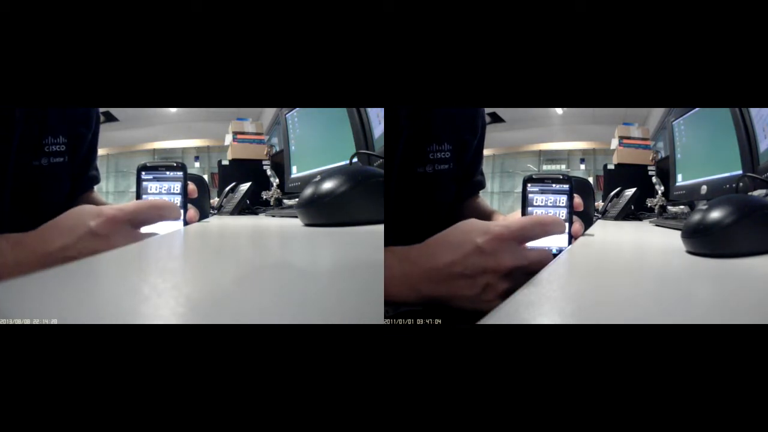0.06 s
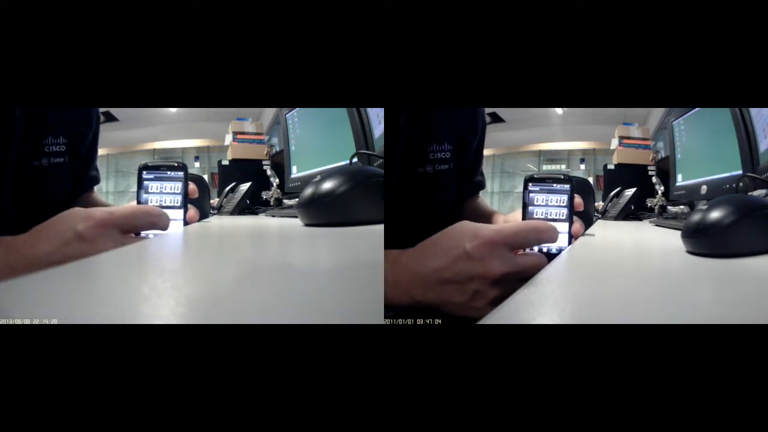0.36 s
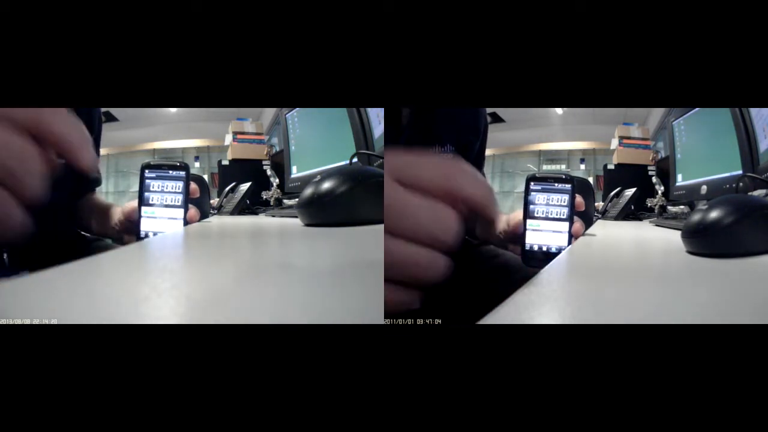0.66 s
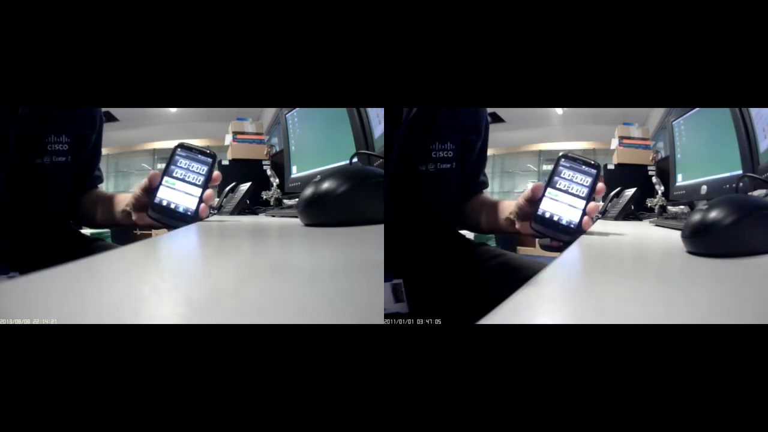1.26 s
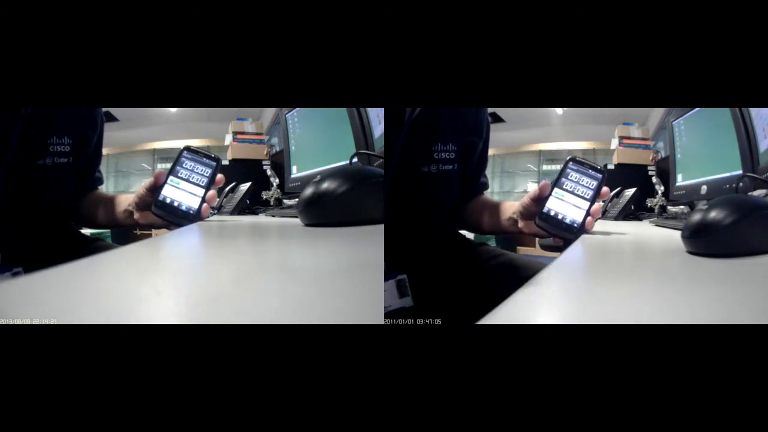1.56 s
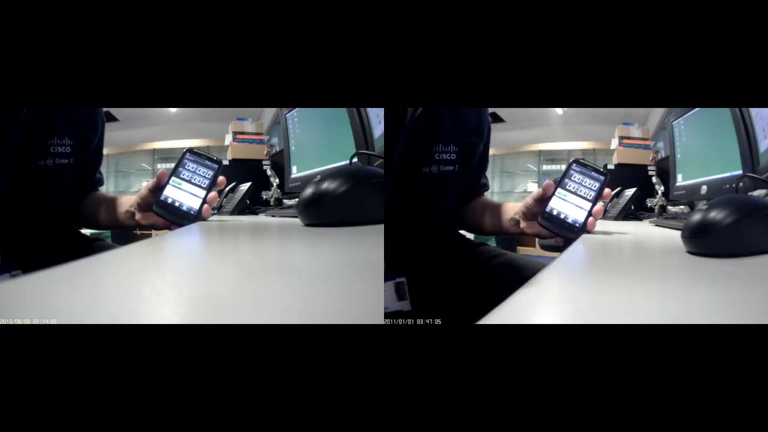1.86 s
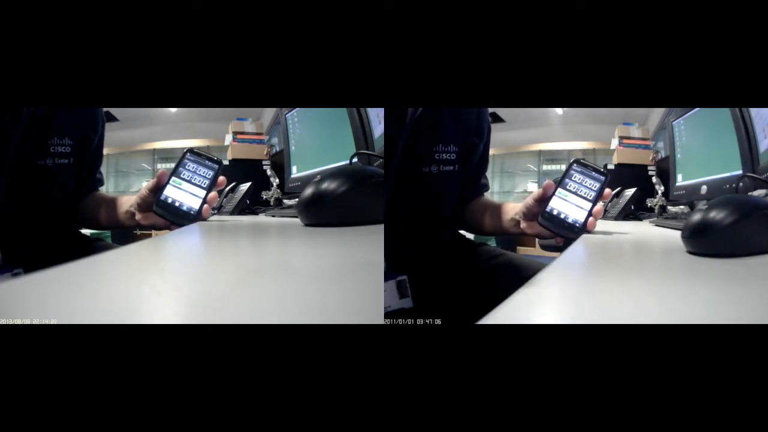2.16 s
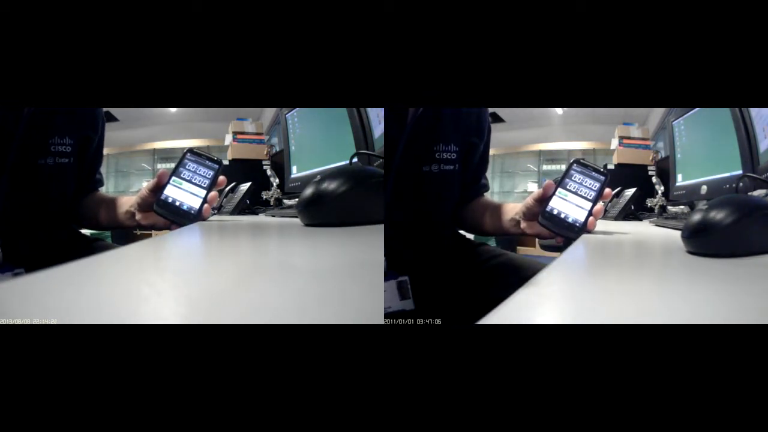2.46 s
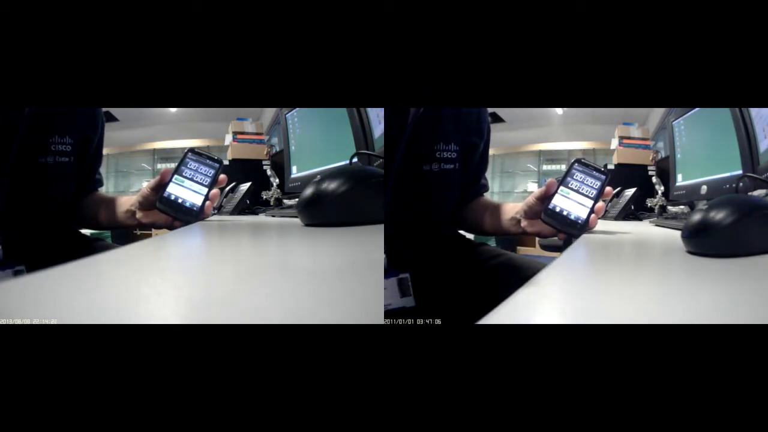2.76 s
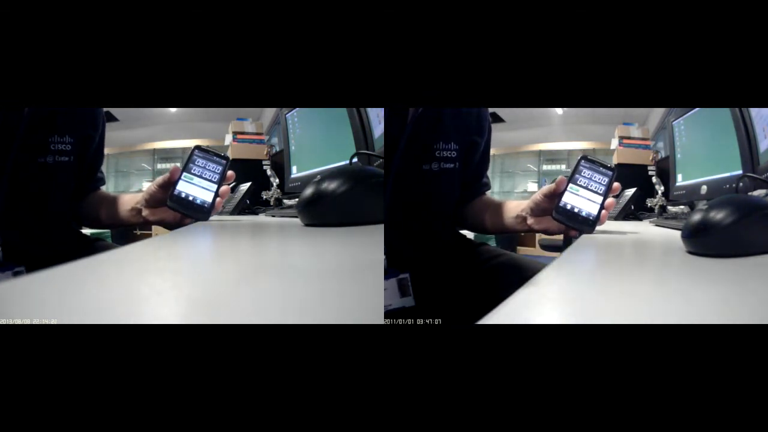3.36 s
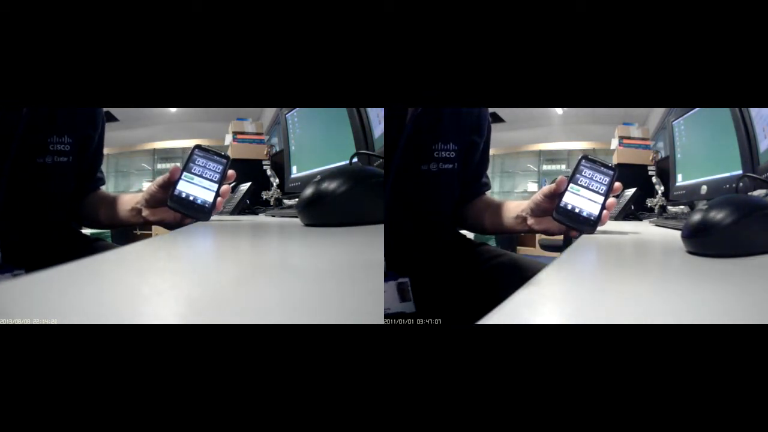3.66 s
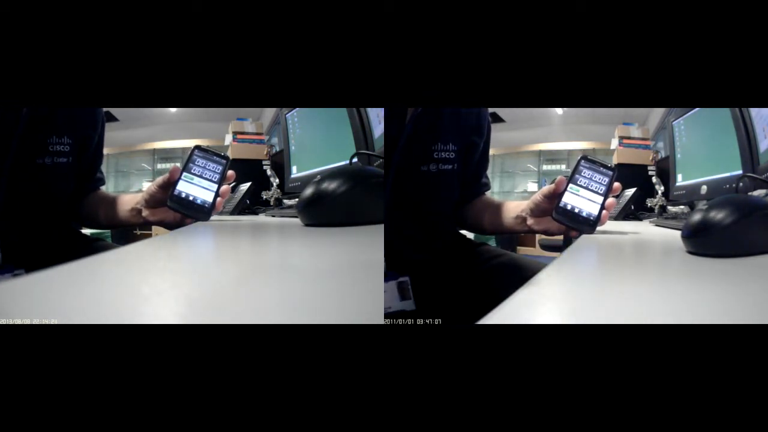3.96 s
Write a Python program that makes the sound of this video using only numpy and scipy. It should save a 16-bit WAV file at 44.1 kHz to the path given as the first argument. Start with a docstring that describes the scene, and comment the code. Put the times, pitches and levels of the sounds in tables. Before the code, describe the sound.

In a quiet office with faint hum and hiss, two dull taps sound on a desk. Then a small handheld device gives rough clicks and scraping rattles, light at first, then louder and denser, its thin casing ringing briefly.

```python
"""Handling a small device at a desk

In a quiet office two soft taps thud, each a press and a release that excite a few low modes. Then small
hard parts slide and rattle in two bouts, the second louder and opened by a faint knock: friction and
sharp impacts ring a thin casing. The desk and the room answer briefly, over ventilation rumble,
a faint mains hum and hiss."""
import sys
import numpy as np
from scipy import signal
from scipy.fft import rfft, irfft, next_fast_len
from scipy.io import wavfile
from scipy.ndimage import uniform_filter1d, map_coordinates

SR = 44100
rng = np.random.default_rng(int(sys.argv[2]) if len(sys.argv) > 2 else 0)


def wrap_up_sound(samples):
    """Save the sound to the file named by the first command line argument, as 16-bit audio."""
    columns = np.atleast_2d(samples).T
    # keep every value between -1 and 1, then stretch to whole-number steps
    tamed = np.clip(columns, -1, 1)
    steps = np.round(tamed * 32767).astype(np.int16)
    wavfile.write(sys.argv[1], SR, steps)


N = 176400

# Clear modes of the casing in each bout: pitch_hz, level_db
FIRST_BOUT_MODES = [(1491, 0), (1648, 0.5), (1829, 4.5), (2508, -3), (2577, 2.5), (3869, -1), (3971, 1.5),
                    (4538, -2), (5482, -1), (6760, 5), (12740, -13)]
SECOND_BOUT_MODES = [(1624, -4.5), (1951, -6), (2100, -5.5), (2455, 3), (2762, -17), (3993, -3),
                     (4452, -2.5), (5195, -2), (5392, -1), (5627, 1), (5866, -3), (6163, -12), (6435, -6),
                     (6557, -11), (6684, 3.5), (6933, 0), (8730, -9), (9050, -4), (9308, -10), (10137, -10),
                     (10471, -5), (12732, -17)]
BOUT_CHANGE_S = 2.8


def amp(db):
    """Decibels to amplitude ratio."""
    return 10 ** (np.asarray(db) / 20)


def unit(x):
    """Normalisation to rms 1."""
    return x / np.sqrt(np.mean(x ** 2) + 1e-20)


def along(points, hz):
    """Interpolation of (frequency, value) points on a logarithmic frequency axis."""
    freqs, values = np.transpose(points)
    return np.interp(np.log(hz + 1), np.log(freqs + 1), values)


def filtered(x, gain):
    """Zero-phase filtering by a gain that depends on frequency."""
    size = next_fast_len(len(x) + SR // 4)
    return irfft(rfft(x, size) * gain(np.fft.rfftfreq(size, 1 / SR)), size)[:len(x)]


def causal(gain, size=2048):
    """Minimum-phase impulse response with the given gain, by folding the cepstrum."""
    cepstrum = irfft(np.log(np.maximum(gain(np.fft.rfftfreq(size, 1 / SR)), 1e-6)))
    cepstrum[1:size // 2] *= 2
    cepstrum[size // 2 + 1:] = 0
    return irfft(np.exp(rfft(cepstrum)))


def through(x, response):
    """Convolution, cut to the input's length."""
    return signal.fftconvolve(x, response)[:len(x)]


def add(track, start_s, sound):
    """Superposition of a sound on the track."""
    part = track[round(start_s * SR):][:len(sound)]
    part += sound[:len(part)]


def wobble(place):
    """Smooth random variation with one knot per unit of place."""
    return map_coordinates(rng.standard_normal(int(place.max()) + 4), [place])


def office():
    """Stationary background: broadband ventilation rumble and hiss, plus two pure tones of mains hum."""
    # Spectral shape of the air noise: frequency_hz, gain_db
    air_spectrum = [(12, -67), (20, 0.5), (53, -1.5), (129, -9), (148, -8), (185, -8.5), (207, -11.5),
                    (238, -11), (416, -16), (549, -15.5), (705, -18), (958, -18.5), (2270, -24),
                    (12100, -31), (15500, -33)]
    # Hum tones: pitch_hz, rms_db
    hum_tones = [(48, -62.5), (120, -59)]
    t = np.arange(N) / SR
    air = amp(-47) * unit(filtered(rng.standard_normal(N), lambda hz: amp(along(air_spectrum, hz))))
    hum = sum(np.sqrt(2) * amp(db) * np.sin(2 * np.pi * (hz * t + rng.random())) for hz, db in hum_tones)
    return air + hum


def taps():
    """Impulse excitation: soft pushes ring low damped modes and reflect from the desk and the room."""
    # Two presses with their releases, then the faint knock: start_s, peak_db, cutoff_hz
    pushes = [(1.2911, -22, 1800), (1.331, -25.5, 750), (1.58, -35, 370), (1.6215, -35.5, 415),
              (2.894, -42.5, 1900)]
    # Spectral shape of a push: frequency_hz, gain_db
    push_spectrum = [(60, -37), (170, -8), (240, 0), (310, 0.5), (600, 0.5), (900, 2.5), (1100, -2.5),
                     (1300, -17), (1700, 0.5), (2300, -12), (4000, -63)]
    # Reflections from the desk and things on it: delay_s, gain
    desk_echoes = [(.0046, 0.17), (0.0111, 0.45), (.017, .16), (.026, 0.077)]
    # Modes rung by a push: pitch_hz, relative_db, t60_s
    low_modes = [(249.7, -18.5, 0.24), (475, -39.5, 0.55), (513, -21.5, 0.6), (618, -22.5, 0.4),
                 (912, -16, .2)]
    out, t = np.zeros(N), np.arange(SR // 2) / SR
    for start_s, peak_db, cutoff_hz in pushes:
        push = causal(lambda hz: amp(along(push_spectrum, hz)) * soft_touch(hz, cutoff_hz))
        push = amp(peak_db) * push / np.abs(push).max()
        add(out, start_s, push)
        for delay_s, gain in desk_echoes:
            add(out, start_s + delay_s, gain * push)
        for hz, relative_db, t60_s in low_modes:
            envelope = amp(peak_db + relative_db - 60 * t / t60_s) * soft_touch(hz, cutoff_hz)
            add(out, start_s, envelope * np.sin(2 * np.pi * hz * t))
        add(out, start_s, amp(-4.5) * signal.fftconvolve(push, room_tail()))
    return out


def soft_touch(hz, cutoff_hz):
    """A compliant contact acts as a low-pass filter: a softer touch excites less treble."""
    return 1 / np.sqrt(1 + (hz / cutoff_hz) ** 6) + 0.043


def room_tail():
    """Diffuse reverberation: a fresh noise response of energy 1, decaying exponentially in each band."""
    # Reverberation time of the office: frequency_hz, t60_s
    decay_times = [(200, 0.19), (2000, 0.17), (6000, 0.1), (14000, 0.11)]
    hz, t, spectra = signal.stft(rng.standard_normal(SR // 2), SR, nperseg=256)
    decay = amp(-60 * t / along(decay_times, hz)[:, None])
    tail = signal.istft(spectra * decay, SR, nperseg=256)[1]
    return np.pad(tail, (SR // 300, 0)) / np.linalg.norm(tail)


def sliding():
    """Stick-slip friction: the parts scrape along the casing in two bouts, with a fluttering level."""
    # Envelope of the sliding: time_s, level_db
    envelope = [(1.795, -58), (1.81, -45.5), (1.86, -41), (1.95, -42.5), (2.06, -46), (2.17, -41.5),
                (2.225, -52), (2.36, -47.5), (2.46, -60.5), (2.7, -58.5), (2.87, -65), (2.895, -43),
                (2.95, -44.5), (3.05, -53), (3.11, -44), (3.175, -33), (3.26, -40), (3.37, -35.5),
                (3.44, -44), (3.57, -39), (3.64, -41), (3.69, -48), (3.745, -36.5), (3.78, -33),
                (3.86, -34), (3.95, -36.5), (4, -39)]
    # Colour of each bout's sliding, relative to the casing: frequency_hz, gain_db
    first_tilt = [(1100, 14), (1700, 5), (2200, 5.5), (2600, 3), (4000, 1.5), (5400, -5.5), (6500, -10.5),
                  (7400, -6.5), (9500, -21), (11500, -6), (13000, 3), (15500, -7)]
    second_tilt = [(1100, 10), (1700, 8.5), (2500, 3.5), (4000, 3), (6500, -6), (9500, -11), (11500, -7),
                   (13000, 2), (15500, 10)]
    slip_swing_db, slips_per_s = 1.5, 90
    t = np.arange(N) / SR
    first = scrape(FIRST_BOUT_MODES, first_tilt, parts=5)
    second = scrape(SECOND_BOUT_MODES, second_tilt, parts=5)
    level_db = np.interp(t, *np.transpose(envelope)) + slip_swing_db * wobble(slips_per_s * t)
    return np.where(t < BOUT_CHANGE_S, first, second) * amp(level_db) * (t > envelope[0][0])


def scrape(modes, tilt, parts, grains_per_s=1100, spread_db=5):
    """Shot noise: each part's random stream of tiny contacts drives a casing response of its own."""
    out = np.zeros(N)
    for _ in range(parts):
        grains = (rng.random(N) < grains_per_s / parts / SR) * rng.choice([-1, 1], N)
        strengths = amp(spread_db * np.clip(rng.standard_normal(N), -2, 2))
        out += through(grains * strengths, contact(modes, colour_spread_db=0))
    return unit(filtered(shifting_spots(out), lambda hz: amp(along(tilt, hz))))


def contact(modes, colour_spread_db):
    """Impact response of the casing: a crack, its rebound, a dense shiver and clear modes, in the room."""
    # Resonance curve of the thin casing: frequency_hz, gain_db
    casing = [(300, -30), (1150, -22), (1600, -5.5), (2050, -7), (2550, -2), (3100, -13), (3850, -1.5),
              (4900, -4), (5500, 3.5), (6100, -3), (6700, 4), (7400, -4), (8150, -15.5), (9200, -6),
              (10400, -5), (11600, -13), (12600, -12.5), (13600, -10.5), (14400, -23), (15700, -19.5)]
    crack_t60_s, shiver_t60_s, mode_t60_s = 0.0051, 0.069, 0.5
    rise_s, shiver_cutoff_hz, colour_step_hz = 0.00052, 11300, 300
    t = np.arange(SR // 2) / SR
    body = causal(lambda hz: amp(
        along(casing, hz) + colour_spread_db * spot_sensitivity(hz) * wobble(hz / colour_step_hz)))
    since_rebound = t - 0.012 * (.5 + rng.random())  # the part strikes again just after it lands
    crack = amp(-1 - 60 * t / crack_t60_s)
    rebound = (since_rebound > 0) * amp(-7.5 - 60 * np.abs(since_rebound) / crack_t60_s)
    # The highest treble is mostly in the crack.
    shiver = filtered(rng.standard_normal(len(t)), lambda hz: 1 / np.hypot(1, (hz / shiver_cutoff_hz) ** 2))
    shiver *= amp(5 - 60 * t / shiver_t60_s)
    strike = ((crack + rebound) * rng.standard_normal(len(t)) + shiver) * (1 - np.exp(-t / rise_s))
    clack = through(strike, body / np.linalg.norm(body))
    pitch_hz, level_db = np.transpose(modes)
    strengths = amp(level_db - 21.5 + 2 * rng.standard_normal(len(modes)))
    tones = np.sin(2 * np.pi * (pitch_hz[:, None] * t + rng.random((len(modes), 1))))
    ring = strengths @ tones * amp(-60 * t / mode_t60_s)
    return clack + ring + amp(-3) * through(clack, room_tail())


def spot_sensitivity(hz, corner_hz=1900):
    """Dependence on the point of excitation, 0 to 1: low resonances change less from spot to spot."""
    return hz / np.hypot(hz, corner_hz)


def shifting_spots(x, spread_db=2.3):
    """A moving point of excitation: the spectrum shifts as the parts touch different spots."""
    hz, _, spectra = signal.stft(x, SR, nperseg=512)
    patches = uniform_filter1d(rng.standard_normal(spectra.shape), size=6, axis=0)  # across frequency
    patches = unit(uniform_filter1d(patches, size=7, axis=1))  # across time
    gain = amp(spread_db * spot_sensitivity(hz)[:, None] * patches)
    return signal.istft(spectra * gain, nperseg=512)[1][:N]


def clicks():
    """Rattling by separate impacts: a hard part skids briefly, then strikes and rings the casing."""
    # Impacts and their strength in three bands: start_s, middle_db, upper_db, top_db
    impacts = [(1.808, -47, -47.5, -67), (1.822, -57, -42, -71), (1.852, -40, -55, -58),
               (1.903, -43, -47.5, -63), (1.941, -44, -53, -62), (1.975, -37, -72, -40),
               (2.098, -37.5, -52, -49), (2.137, -37, -47, -43), (2.225, -53, -66, -57),
               (2.245, -39, -45.5, -70), (2.285, -34, -48.5, -41.5), (2.384, -44, -59, -46),
               (2.413, -45.5, -58, -51), (2.5, -52, -55, -65), (2.538, -46, -57, -53),
               (2.64, -55, -58, -73), (2.759, -50, -62, -56), (2.913, -58, -44, -66),
               (3.034, -47.5, -56, -65), (3.071, -45, -54, -43), (3.089, -36.5, -29, -47),
               (3.128, -28.5, -28, -39), (3.162, -48, -38, -34), (3.187, -33.5, -31, -49),
               (3.233, -33, -46, -38), (3.274, -44, -43, -38.5), (3.288, -44, -35.5, -55),
               (3.308, -42, -52, -52), (3.346, -34.5, -48, -33), (3.383, -38, -34.5, -41),
               (3.4509, -38.5, -34, -44), (3.496, -30.5, -29.5, -40), (3.541, -27.5, -38, -37),
               (3.589, -38, -33, -50), (3.609, -42, -46, -48), (3.657, -59, -39.5, -57),
               (3.706, -34.5, -44, -63), (3.744, -35.5, -35.5, -40), (3.761, -30.5, -22.5, -29),
               (3.769, -26.5, -21, -31), (3.8167, -27.5, -22.5, -33), (3.8551, -33.5, -33.5, -37),
               (3.886, -36, -27.5, -42), (3.909, -31, -29, -33), (3.933, -38, -30.5, -39)]
    trim_db, skid_db, skid_rise_s = -1, -17, 0.0075
    out, attack_samples = np.zeros(N), 530
    shares = band_shares(np.fft.rfftfreq(attack_samples, 1 / SR))
    for start_s, *band_db in impacts:
        modes = FIRST_BOUT_MODES if start_s < BOUT_CHANGE_S else SECOND_BOUT_MODES
        hit = contact(modes, colour_spread_db=2.8)
        band_rms = np.sqrt(2 * shares @ np.abs(rfft(hit[:attack_samples])) ** 2) / attack_samples
        gains = amp(np.array(band_db) + trim_db) / band_rms
        click = through(hit, causal(lambda hz: gains @ band_shares(hz)))
        add(out, start_s, click)
        attack = click[:attack_samples]  # lends the skid its colour
        skid = signal.fftconvolve(rng.standard_normal(3 * attack_samples - 1), attack, "valid")
        swell = np.exp(-np.arange(len(skid))[::-1] / SR / skid_rise_s)
        add(out, start_s - len(skid) / SR, amp(skid_db) * attack.std() * unit(skid) * swell)
    return out


def band_shares(hz, edges_hz=(5390, 13300)):
    """Complementary crossover: the middle, upper and top bands sum to 1 at each frequency."""
    middle, below_top = [1 / (1 + (hz / edge) ** 16) for edge in edges_hz]
    return np.array([middle, below_top - middle, 1 - below_top])


def scene():
    """Superposition of all sources at one microphone."""
    return (office() + taps() + sliding() + clicks())[None]


def record(dry, limit_hz=15750):
    """Band limiting: an ideal low-pass filter removes the highest treble."""
    return np.array([filtered(x, lambda hz: hz < limit_hz) for x in dry])


dry = scene()
out = record(dry)
wrap_up_sound(out)
```